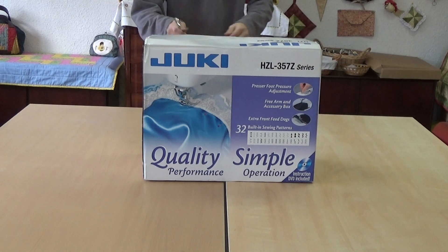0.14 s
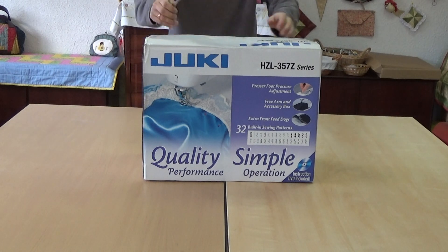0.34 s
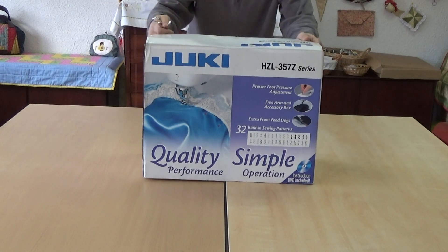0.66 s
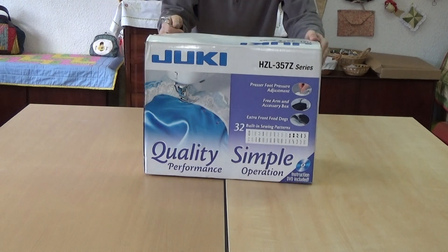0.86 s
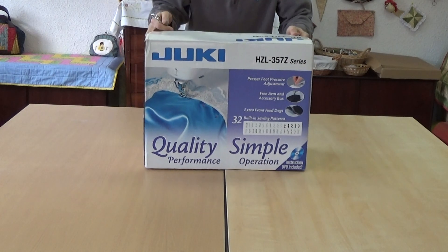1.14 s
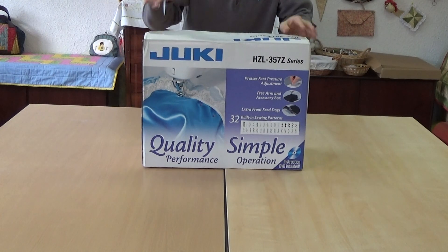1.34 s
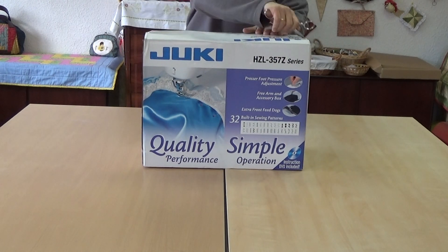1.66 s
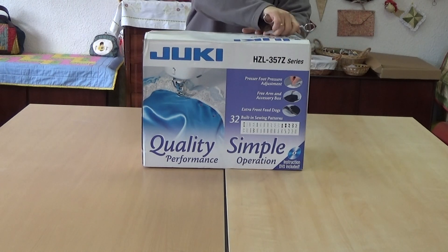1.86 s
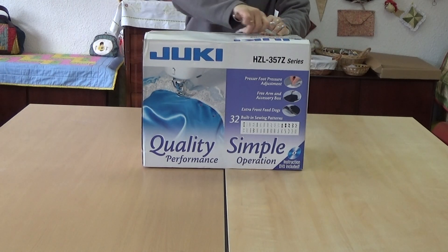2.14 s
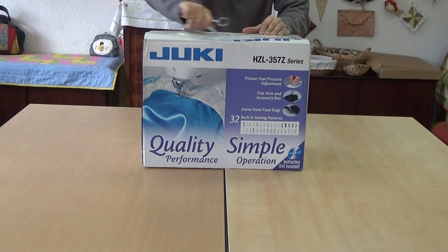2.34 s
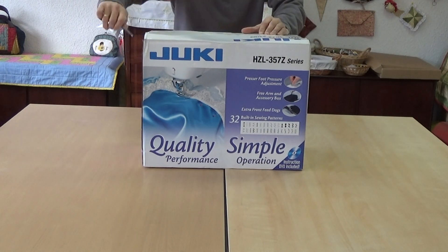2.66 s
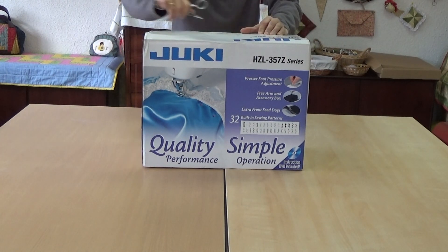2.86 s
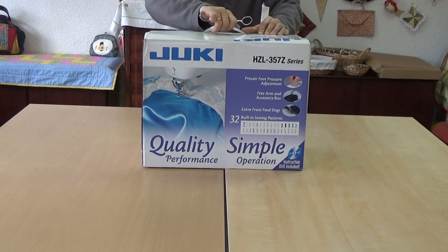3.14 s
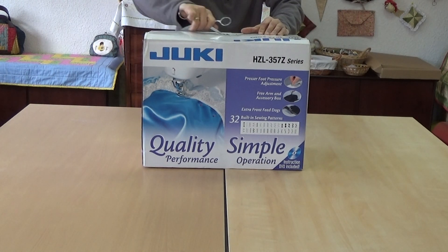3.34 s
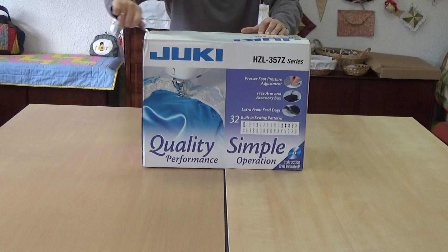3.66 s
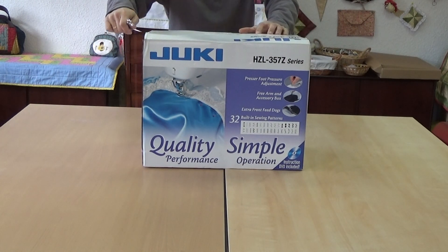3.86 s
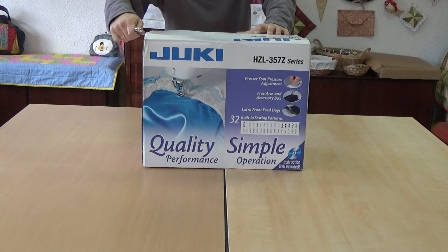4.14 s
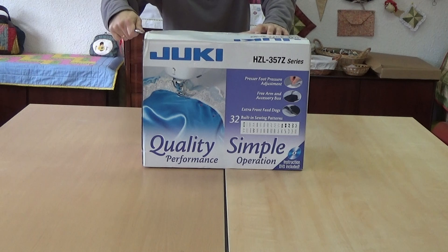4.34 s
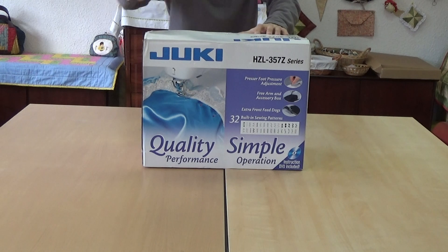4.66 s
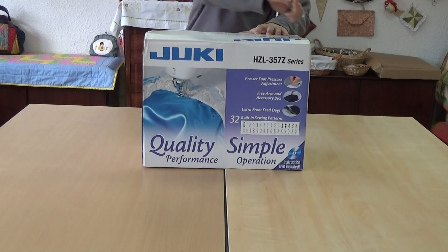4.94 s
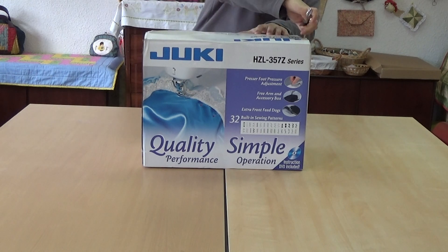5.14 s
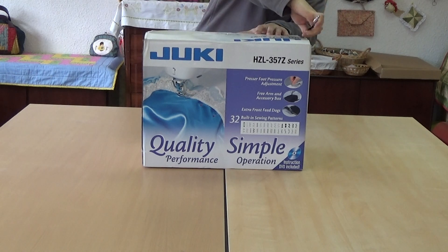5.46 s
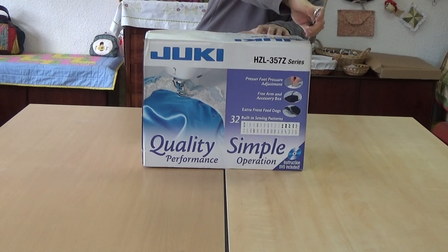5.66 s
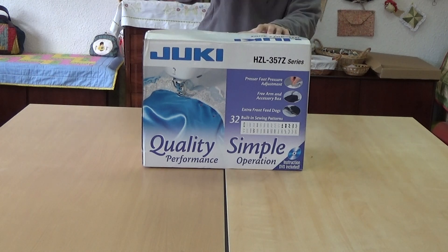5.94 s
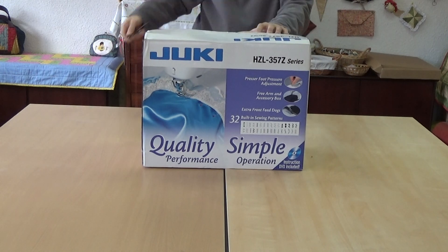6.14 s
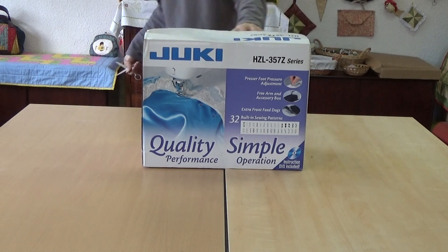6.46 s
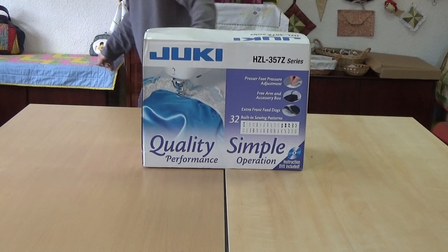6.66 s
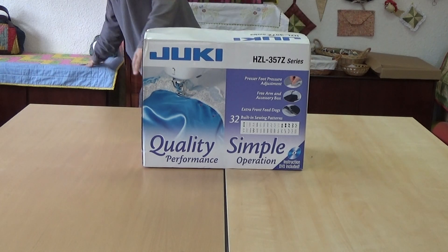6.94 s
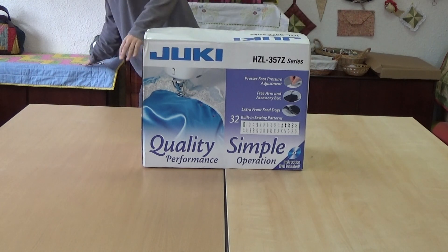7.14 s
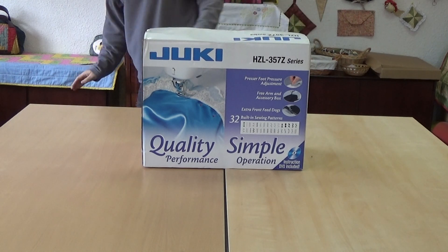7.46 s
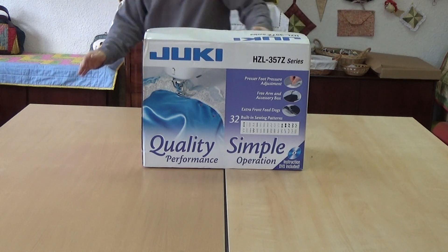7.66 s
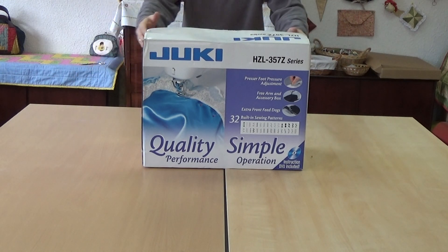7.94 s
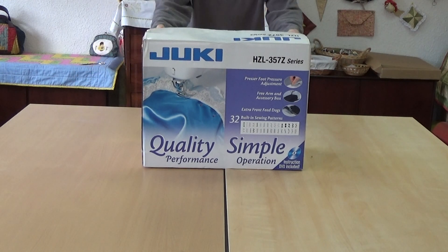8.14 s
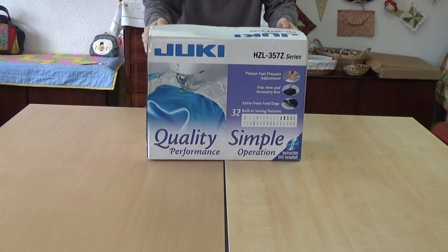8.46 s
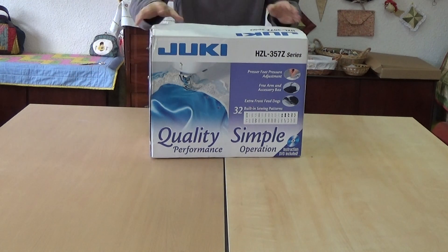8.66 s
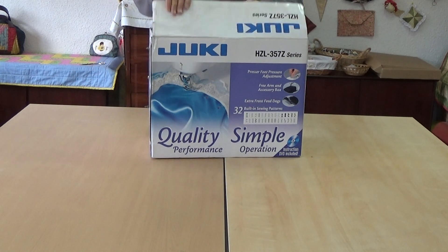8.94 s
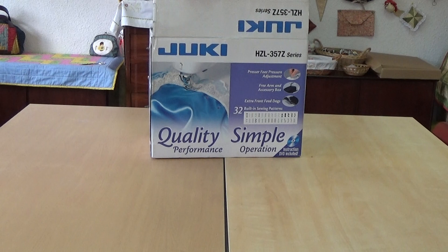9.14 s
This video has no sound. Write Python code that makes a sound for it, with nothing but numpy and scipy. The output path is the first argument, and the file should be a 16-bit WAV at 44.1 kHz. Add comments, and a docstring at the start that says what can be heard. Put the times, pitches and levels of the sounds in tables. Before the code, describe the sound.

A scissor blade scratches through packing tape on a cardboard box, amid rubbing palms, bumps, metal clinks and creaking flaps.

```python
"""A scratchy, drumming cut through packing tape, amid the rubs, knocks and cracks of a big cardboard box.
Hands turn the box on a table, slit its tape with a scissor blade and bend the lid open. The blade
moves in tiny slips that drum the panels, rasp the card and tear the tape; palms brush, folds creak,
edges snap and the scissors clink. A small live room answers, over soft air, hum and a faint whirr."""
import sys
import numpy as np
from scipy import signal
from scipy.fft import rfft, irfft, next_fast_len
from scipy.io import wavfile
from scipy.ndimage import uniform_filter1d, map_coordinates

SR = 44100
rng = np.random.default_rng(int(sys.argv[2]) if len(sys.argv) > 2 else 0)


def pcm_store(signal):
    """Save signal as 16-bit PCM."""
    levels = np.round(np.clip(np.atleast_2d(signal), -1, 1) * 32767)
    wavfile.write(sys.argv[1], SR, levels.astype(np.int16).T)


N = 410130
TIME = np.arange(N) / SR

# Room decay. Each row: frequency in Hz, seconds to fall by 60 dB.
ROOM_DECAY = [(100, 0.68), (260, 0.32), (700, 0.4), (2000, 0.33), (5000, 0.34), (13000, 0.35)]
# Stereo width. Each row: frequency in Hz, gain of the side signal in dB.
STEREO_WIDTH = [(40, -26), (130, -20.5), (300, -14.5), (900, -7), (3000, -8), (9000, -8), (12500, -23.5)]
# Wavering room hum. Each row: pitch in Hz, nominal width in Hz, level in dB.
HUM_BANDS = [(44.3, 14, -56), (198.4, 8.3, -57)]
# Tone colours. Each row: frequency in Hz, relative level in dB.
AIR_TONE = [(22, -11), (34, -18), (48, -5), (70, -17), (105, 8), (210, -1.5), (320, 0.5), (600, -3),
            (1000, -8), (1500, -10), (2600, -7.5), (3500, -11.5), (7000, -13), (10500, -17.5),
            (14300, -21.5), (16000, -30)]  # the room's bed of noise
PALM_TONE = [(50, -26), (130, 5.5), (280, 3.5), (800, 5), (1300, 1), (2100, 3.5), (3500, -2), (8000, -50.5)]  # skin pressing on card
BRUSH_TONE = [(1200, -20.5), (3000, 7.5), (4800, 5.5), (6500, 8), (10000, 3.5), (13000, -3), (16000, -12)]  # the hiss on top of a rub
KNOCK_TONE = [(80, -27), (220, -8), (380, 2), (600, -5), (1200, 1.5), (3000, 19), (8000, -30)]  # a blow on a panel
THUD_TONE = [(45, -25.5), (85, -19.5), (125, -5.5), (190, -6), (300, -16), (700, -44), (2000, -60)]  # the air inside the box
SNAP_TONE = [(600, -23), (2500, 6.5), (4500, 5), (7000, 3), (11000, -0.5), (16000, -16.5)]  # a bright tick
RASP_TONE = [(300, -39), (750, -4), (1050, 13), (1650, 9.5), (2800, 6.5), (4000, -4), (7000, -19),
             (16000, -65)]  # a scraped card edge
TEAR_TONE = [(1500, -37), (3500, -4), (4600, 5.5), (6500, 11), (8300, 5.5), (10200, 8), (12300, 0.5),
             (16000, -7)]  # tearing tape
# Ring of the scissor blades. Each row: pitch in Hz, relative level in dB.
STEEL_MODES = [(5120, 6), (6400, 0), (6800, -4), (7640, 1), (8300, -11), (9160, -2), (10600, 3.5),
               (12570, 5), (13300, -3), (13890, 8)]
# Body of the box. Each row: pitch in Hz, width in Hz, relative level in dB.
BOX_MODES = [(151.6, 31, 2), (239.5, 41, 0.5), (327, 43, 1.5), (431.5, 43, 2), (563, 126, 0.5),
             (721, 130, -1.5), (870, 70, -11), (1062, 114, -4), (1275, 42, -14)]

# Cue levels below are in dB; most sources add a trim.
# Scissor clinks. Each row: start in seconds, level in dB, brightest pitch in Hz, mode width in Hz
# (wider for a tighter grip).
SCISSOR_CLINKS = [(0.04, -37.5, 8900, 300), (1.623, -30.5, 9100, 600), (1.792, -38, 9150, 600),
                  (4.815, -38, 5230, 110), (6.728, -33, 8340, 300), (6.733, -34.5, 13100, 400),
                  (6.994, -18.5, 9864, 597), (6.999, -27, 14000, 900)]
# Palms, sleeves and the flat of the blade sliding on card. Each row: start, fastest moment and end
# in seconds, pressure in dB, brush in dB.
HAND_RUBS = [(0.233, 0.308, 0.4, -56, -45), (0.545, 1.162, 1.373, -39.5, -38.5),
             (1.498, 1.518, 1.746, -46.5, -47.5), (4.043, 4.123, 4.43, -49.5, -48),
             (5.208, 5.28, 5.48, -48.5, -48), (6.237, 6.42, 6.74, -48, -44.5),
             (7.835, 7.87, 8.2, -57, -48.5), (8.008, 8.144, 8.21, -40, -39),
             (8.25, 8.47, 8.69, -36.5, -36.5), (8.754, 8.89, 9.05, -39.5, -39),
             (8.971, 8.995, 9.2, -38.5, -40), (9.136, 9.173, 9.4, -41, -36)]
# Chattering panels, folds, flaps and tape. Each row: start in seconds, level in dB, pitch in Hz.
FOLD_CREAKS = [(0.298, -36.5, 2120), (0.86, -39, 6970), (0.917, -34, 1490), (1.077, -31.5, 1960),
               (2.375, -23.5, 5000), (2.385, -19.5, 220), (2.638, -27, 3000), (3.733, -26.5, 2550),
               (5.588, -21, 1580), (6.998, -20.5, 282), (8.765, -43, 3400), (8.876, -27.5, 4828),
               (8.974, -19, 2020), (8.976, -23.5, 5000), (9.263, -21, 5270)]
# Stiff card edges snapping. Each row: start in seconds, tick in dB, low crack in dB.
EDGE_SNAPS = [(0.4767, -33, -37), (0.6747, -27.5, -57), (1.7338, -31, -49), (1.795, -35.5, -45),
              (1.959, -31, -46), (2.0105, -21, -27.5), (2.0863, -28.5, -33), (3.0876, -34.5, -41),
              (3.236, -29.5, -39), (4.0524, -34, -49), (4.5425, -25, -44), (4.97, -34.5, -57),
              (4.996, -40, -60), (5.22, -35.5, -41.5), (5.7967, -36, -46), (5.8878, -40.5, -53),
              (5.5549, -25.5, -28.5), (6.2147, -25, -56), (8.2531, -27.5, -36.5), (8.2785, -21.5, -33),
              (8.767, -27, -51), (9.0465, -19.5, -40)]
# Hands and table bumping the box. Each row: start in seconds, panel in dB, thud in dB, panel pitch in Hz.
BOX_KNOCKS = [(0.241, -36.5, -54, 387), (0.3, -34, -48, 300), (0.475, -30.5, -27, 202),
              (0.609, -24.5, -32, 331), (0.638, -41, -36, 336), (1.15, -40, -33.5, 207),
              (2.016, -25, -51, 570), (2.335, -17, -42, 440), (2.409, -17, -44, 205),
              (3.086, -25, -30, 513), (3.494, -10.5, -22.5, 440), (4.43, -14, -26, 377),
              (5.147, -41.5, -42, 202), (5.272, -33.5, -37.5, 280), (5.592, -15, -54, 336),
              (6.218, -29.5, -47, 453), (6.765, -24, -43, 473), (7.004, -20, -33, 590),
              (7.715, -30, -46, 374), (8.178, -29, -39, 207), (8.73, -30.5, -40, 970),
              (8.862, -24.5, -39, 550), (8.985, -25.5, -49, 500), (9.145, -16, -30.5, 320)]
# A tab or taut tape letting go. Each row: start in seconds, level in dB, pitch in Hz.
TAPE_POPS = [(4.144, -24, 3760), (4.288, -21, 3260), (8.2807, -16.5, 5570), (9.0488, -15, 4300)]
# Tape crackling in a run of pops. Each row: start and length in seconds, level in dB, pitch in Hz.
TAPE_RIPS = [(0.859, .036, -27.5, 7500), (2.57, .04, -16, 12000), (3.513, .065, -14.5, 11000)]
# Tape giving way all at once. Each row: start in seconds, drum, rasp and tear in dB, rise in seconds,
# ring of the tape in Hz.
TAPE_BREAKS = [(4.143, -20, -26, -32, 0.0067, 3500), (4.286, -34, -31.5, -33.5, 0.004, 3400),
               (6.991, -21.5, -24.5, -28, .012, 1370)]
# Cuts along the tape, one list a stroke. Each row: time in seconds, blade force in dB, tear in dB.
BLADE_STROKES = [
    [(2.03, -33.5, -38), (2.054, -39, -49), (2.2, -33.5, -47), (2.312, -29.5, -37), (2.36, -17.5, -26),
     (2.42, -21, -28), (2.458, -25.5, -32.5), (2.596, -23, -27), (2.68, -33.5, -39)],
    [(3.25, -34.5, -47.5), (3.49, -29, -44), (3.522, -23.5, -22.5), (3.568, -24.5, -40), (3.584, -22, -26),
     (3.718, -23.5, -37.5), (3.76, -43, -44)],
    [(4.32, -35, -37), (4.34, -34.5, -35.5), (4.438, -25, -32), (4.5, -41, -47)],
    [(5.55, -18, -42), (5.554, -35, -38), (5.604, -22, -26), (5.65, -30.5, -42)],
]


def amp(db):
    """Decibels to gain."""
    return 10 ** (np.asarray(db) / 20)


def unit(x):
    """Scale to an rms of 1."""
    return x / np.sqrt(np.mean(x ** 2) + 1e-20)


def along(points, hz):
    """Read (Hz, value) points on a log frequency axis."""
    freqs, values = np.transpose(points)
    return np.interp(np.log(hz + 1), np.log(freqs), values)


def tone(points):
    """An EQ curve through (Hz, dB) points."""
    return lambda hz: amp(along(points, hz))


def modes(rows):
    """An EQ curve of resonances, each given as (Hz, width in Hz, dB)."""
    return lambda f: np.sqrt(sum(np.abs(amp(db) * f * width / (hz * hz - f * f + 1j * f * width)) ** 2
                                 for hz, width, db in rows))


def band(centre_hz, width_hz):
    """A steep-sided EQ peak: two like resonances in series."""
    return lambda hz: modes([(centre_hz, width_hz, 0)])(hz) ** 2


def ring(x, curve, size=2 ** 13):
    """Let x excite a body with this EQ curve: a minimum-phase filter of unit energy."""
    cepstrum = irfft(np.log(curve(np.fft.rfftfreq(size, 1 / SR)) + 1e-6), size)
    cepstrum[1:size // 2] *= 2
    cepstrum[size // 2 + 1:] = 0
    kernel = irfft(np.exp(rfft(cepstrum)), size)
    return signal.oaconvolve(x, kernel / np.linalg.norm(kernel))[:N]


def equalise(x, curve):
    """Apply an EQ curve with no phase shift."""
    size = next_fast_len(N + SR // 2)
    return irfft(rfft(x, size) * curve(np.fft.rfftfreq(size, 1 / SR)), size)[..., :N]


def catching(rate, depth):
    """Friction catches and runs free: a smooth random gain with rate knots a second."""
    wobble = map_coordinates(rng.standard_normal(SR // 10), [TIME * rate], mode="wrap")
    return unit(amp(depth * wobble))


def slips(count, rate, spread_db):
    """Stick-slip clicks of uneven size, about rate a second."""
    sizes = amp(spread_db * np.clip(rng.standard_normal(count), -2, 2)) * rng.choice([-1, 1], count)
    return unit(sizes * (rng.random(count) < rate / SR))


def burst(rise_s, rate=9000):
    """A run of slips that swells and dies away, whitened to excite all pitches evenly."""
    age = np.arange(int(10 * rise_s * SR) + 64) / (rise_s * SR)  # in rise times
    swell = age * np.exp(1 - age)
    spectrum = rfft(swell * slips(len(age), rate, spread_db=2.5), next_fast_len(2 * len(age)))
    white = irfft(spectrum / (np.abs(spectrum) + 1e-12))[:len(age)]
    return unit(white * np.sqrt(swell)) * np.sqrt(np.mean(swell ** 2))


def add(track, start, sound):
    """Mix a sound into a track at start seconds."""
    part = track[max(round(start * SR), 0):][:len(sound)]
    part += sound[:len(part)]


def stereo(mid, side):
    """Left and right from mid and side, narrowest in the bass."""
    side = equalise(side, tone(STEREO_WIDTH))
    return np.array([mid + side, mid - side])


def room_tone(air_db=-54):
    """Soft air, with narrow bands of noise for a low wavering hum."""
    mid, side = [ring(rng.standard_normal(N), tone(AIR_TONE)) for _ in range(2)]
    hum = sum(amp(db) * ring(rng.standard_normal(N), band(hz, 2 * width)) for hz, width, db in HUM_BANDS)
    return amp(air_db) * stereo(mid, side) + hum


def drive_whirr(whirr_db=-63, tick_db=-67, pulse_hz=25):
    """A camera's drive whirrs in even pulses and ticks on every second one."""
    turn = np.cos(np.pi * pulse_hz * TIME)
    whirr = ring(rng.standard_normal(N) * (0.13 + turn ** 2), band(2540, 280))
    tick = ring(rng.standard_normal(N) * np.maximum(turn, 0) ** 4, band(3250, 600))
    return amp(whirr_db) * unit(whirr) + amp(tick_db) * unit(tick)


def room(x, direct_db=-4, wet_db=-2, early_db=-2, tail_count=12):
    """Table and near walls answer first, then a diffuse tail whose pattern keeps shifting."""
    age = np.arange(SR // 2) / SR
    hz, t, noise = signal.stft(rng.standard_normal((tail_count, 2, len(age))), SR, nperseg=256)
    decay = amp(-60 * t / along(ROOM_DECAY, hz)[:, None])
    tails = signal.istft(noise * decay, SR, nperseg=256)[1][..., :len(age)]
    early_lift = 1 + amp(early_db) * np.exp(-age / 0.0081)
    fade_in = 1 - np.exp(-(age / 0.0036) ** 2)
    tails = tails * early_lift * fade_in
    hop = SR // 28
    size = next_fast_len(len(age) + 2 * hop)
    answers = rfft(tails / np.linalg.norm(tails, axis=-1, keepdims=True), size)
    # overlapping grains take the tails in turn, as if moving hands shifted the reflections
    window = np.sin(np.pi * np.arange(2 * hop) / (2 * hop))
    padded = np.pad(x, (hop, 2 * hop))
    wet = np.zeros((2, N + hop + size))
    for k, start in enumerate(range(0, N + hop, hop)):
        grain = rfft(padded[start:start + 2 * hop] * window, size)
        wet[:, start:start + size] += irfft(grain * answers[k % tail_count], size)
    mid, side = amp(wet_db) * wet[:, hop:hop + N]
    return stereo(amp(direct_db) * x + mid, side)


def scissors(ring_db=-2, tick_db=-4, width_hz=3000, detune=0.012):
    """Steel blades clink: the contact picks which modes speak, the grip detunes and damps them."""
    out = np.zeros(N)
    for start, db, centre, damping in SCISSOR_CLINKS:
        steel = modes([(hz * rng.normal(1, detune), damping, level) for hz, level in STEEL_MODES])
        touch = modes([(centre, width_hz, 0)])
        clink = ring(burst(rise_s=0.0028), lambda hz: steel(hz) * touch(hz) ** 2)
        tick = ring(burst(rise_s=0.0031), lambda hz: tone(SNAP_TONE)(hz) * np.sqrt(touch(hz)))
        add(out, start, amp(db + ring_db) * clink)
        add(out, start, amp(db + tick_db) * tick)
    return out


def palms(press_db=0.5, brush_db=-2.5, swell_db=6.5, land_s=0.0084, lift_s=0.058):
    """Skin and cloth drag over the card in fine grains, loudest where the slide is fastest."""
    press, brush = np.zeros((2, N))
    slow = amp(-swell_db)
    for start, fastest, end, weight_db, hiss_db in HAND_RUBS:
        contact = np.clip((TIME - start) / land_s, 0, 1) * np.clip((end - TIME) / lift_s, 0, 1)
        speed = contact * np.interp(TIME, [start, fastest, end], [slow, 1, slow])
        press += amp(weight_db + press_db) * speed
        brush += amp(hiss_db + brush_db) * speed
    grains = catching(rate=35, depth=1.1) * slips(N, rate=8000, spread_db=3)
    return ring(press * grains, tone(PALM_TONE)) + ring(brush * grains, tone(BRUSH_TONE))


def chatter(pitch_hz, rise_s, relative_width=0.36, lowpass_hz=10000):
    """A quick run of slips excites one resonance of a flap or the tape."""
    flap = modes([(pitch_hz, relative_width * pitch_hz, 0)])
    return ring(burst(rise_s, rate=3000), lambda hz: flap(hz) / np.hypot(1, (hz / lowpass_hz) ** 2))


def creaks(tape_ring_db=-25.5):
    """Folds chatter as they bend, and the tape rings as it gives way."""
    out = np.zeros(N)
    for start, db, hz in FOLD_CREAKS:
        add(out, start, amp(db) * chatter(hz, rise_s=0.0067))
    for start, *_, rise_s, hz in TAPE_BREAKS:
        add(out, start, amp(tape_ring_db) * chatter(hz, rise_s))
    return out


def snaps(tick_db=-6, crack_db=-2):
    """Stiff edges let go over a few milliseconds: a bright tick on a lower crack."""
    tick, crack = np.zeros((2, N))
    for start, db, low_db in EDGE_SNAPS:
        add(tick, start, amp(db + tick_db) * burst(rise_s=0.003, rate=26000))
        add(crack, start, amp(low_db + crack_db) * burst(rise_s=0.0054))
    return ring(tick, tone(SNAP_TONE)) + ring(crack, tone(RASP_TONE))


def knocks(panel_db=-7, thud_db=-3, width_hz=380, rise_s=0.0059):
    """Soft blows ring the box modes near the struck panel's pitch and thump the air inside."""
    panel, thud = np.zeros((2, N))
    for start, db, deep_db, centre in BOX_KNOCKS:
        focus = modes([(centre, width_hz, 0)])
        struck = lambda hz: modes(BOX_MODES)(hz) * tone(KNOCK_TONE)(hz) * focus(hz)
        add(panel, start, amp(db + panel_db) * ring(burst(rise_s), struck))
        add(thud, start, amp(deep_db + thud_db) * burst(rise_s))
    return panel + ring(thud, tone(THUD_TONE))


def pops(trim_db=4, width_hz=7000, pops_per_rip=5, pitch_scatter=0.13):
    """Tension lets go in bright clicks: singly, or unevenly spaced along a rip."""
    rip_pops = []
    for start, length, db, hz in TAPE_RIPS:
        for k, (late, pitch) in enumerate(rng.standard_normal((pops_per_rip, 2))):
            delay = length * (k + .25 * late) / pops_per_rip
            rip_pops.append((start + delay, db, hz * np.exp(pitch_scatter * pitch)))
    out = np.zeros(N)
    for start, db, centre in TAPE_POPS + rip_pops:
        pop = ring(burst(rise_s=0.0002, rate=29000), band(centre, width_hz))
        add(out, start, amp(db + trim_db) * pop)
    return out


def stroke_envelopes():
    """Blade force, tearing gain and share of the stroke travelled, all zero between strokes."""
    curves = np.zeros((3, N))
    for stroke in BLADE_STROKES:
        times, *levels = np.transpose(stroke)
        gains = [amp(np.interp(TIME, times, db)) for db in levels]
        travel = (TIME - times[0]) / (times[-1] - times[0])
        cutting = (TIME > times[0]) & (TIME < times[-1])
        curves += np.array(gains + [travel]) * cutting
    return uniform_filter1d(curves, size=300, axis=1)


def panel_tone(hz):
    """The EQ curve of the panels: too heavy for treble, too small for deep bass."""
    return modes(BOX_MODES)(hz) / np.hypot(1, (hz / 1500) ** 2) / np.hypot(1, (125 / (hz + 1)) ** 3)


def blade(drum_db=-2, rasp_db=-3.5, stiffen_db=2):
    """Blade slips and sudden tape breaks drum the box, rasp the card edge and tear the tape."""
    force, tearing, travel = stroke_envelopes()
    stiffness = amp(stiffen_db * (travel - .5))  # toward the stiff corner, drum gives way to rasp
    catch = catching(rate=75, depth=2.2)
    coarse = catch * slips(N, rate=1300, spread_db=3)
    fine = unit(coarse + .5 * catch * slips(N, rate=6000, spread_db=2))
    drum = amp(drum_db) * force / stiffness * coarse
    rasp = amp(rasp_db) * force * stiffness * coarse
    tear = tearing * fine
    for start, panel_db, edge_db, tape_db, rise_s, _ in TAPE_BREAKS:
        add(drum, start, amp(panel_db) * burst(rise_s))
        add(rasp, start, amp(edge_db) * burst(rise_s))
        add(tear, start, amp(tape_db) * burst(rise_s))
    return ring(drum, panel_tone) + ring(rasp, tone(RASP_TONE)) + ring(tear, tone(TEAR_TONE))


def scene(pan_db=0.09):
    """The box sits almost dead centre in the room, over the quiet bed."""
    box = blade() + palms() + knocks() + snaps() + pops() + creaks() + scissors()
    return room(box) * amp([[pan_db], [-pan_db]]) + room_tone() + drive_whirr()


def record(dry, top_hz=15950):
    """A steep low-pass takes off the very top."""
    return equalise(dry, lambda hz: 1 / np.hypot(1, (hz / top_hz) ** 200))


dry = scene()
out = record(dry)
pcm_store(out)
```